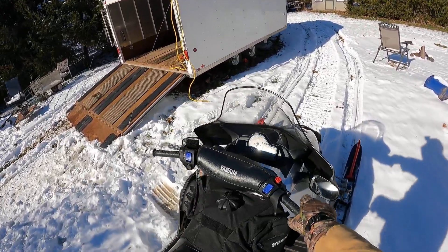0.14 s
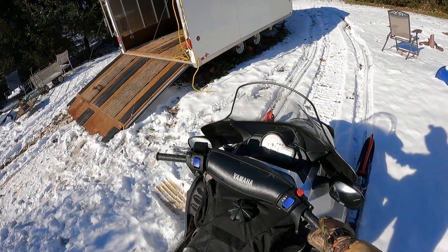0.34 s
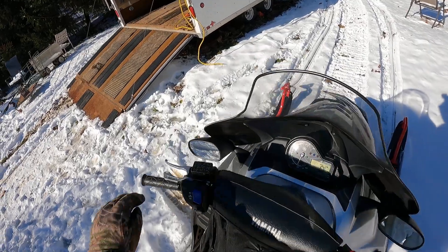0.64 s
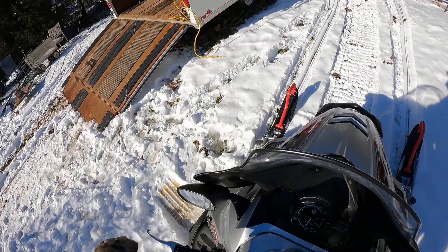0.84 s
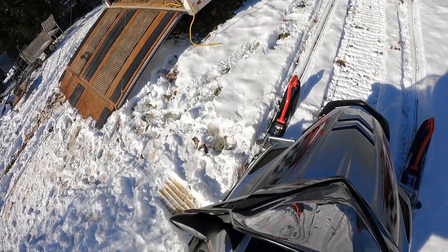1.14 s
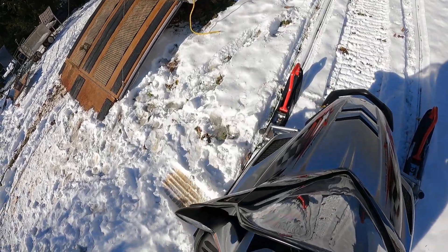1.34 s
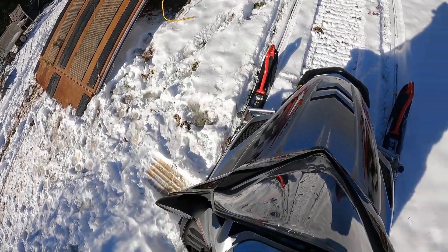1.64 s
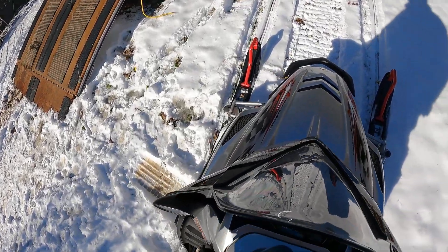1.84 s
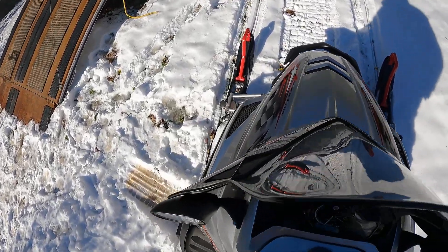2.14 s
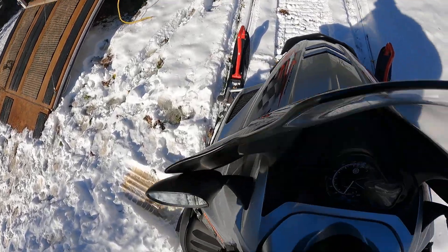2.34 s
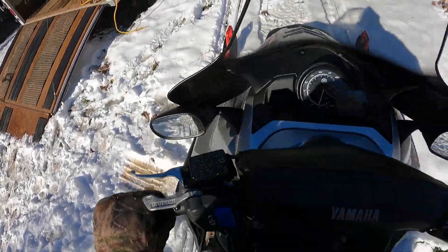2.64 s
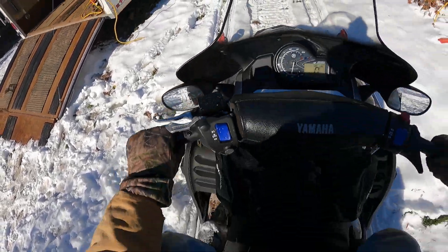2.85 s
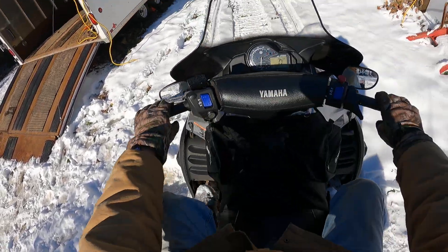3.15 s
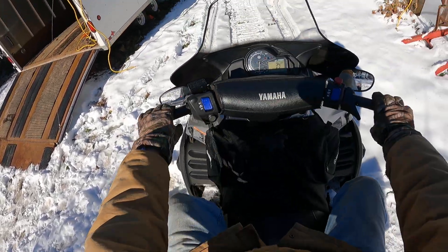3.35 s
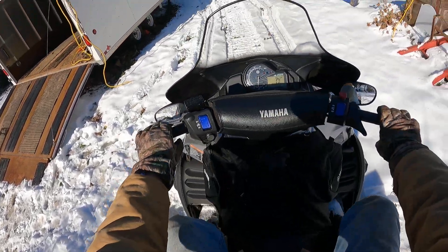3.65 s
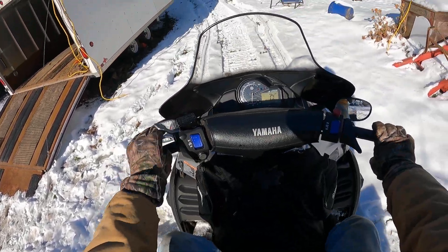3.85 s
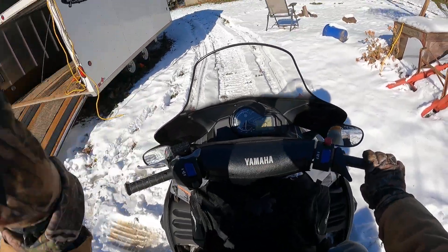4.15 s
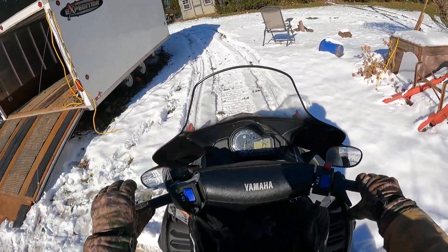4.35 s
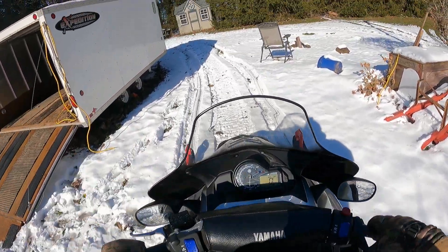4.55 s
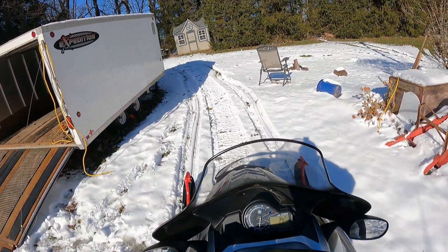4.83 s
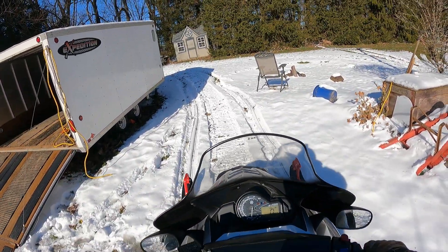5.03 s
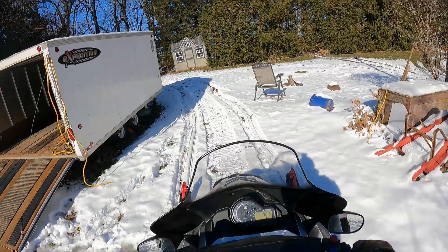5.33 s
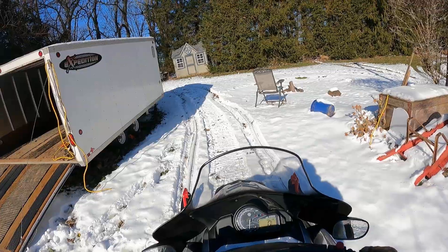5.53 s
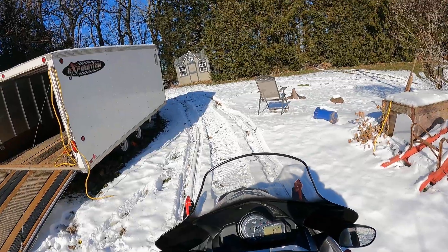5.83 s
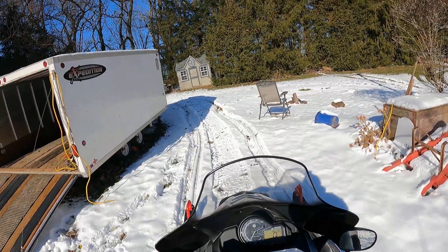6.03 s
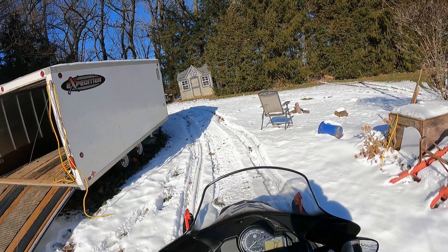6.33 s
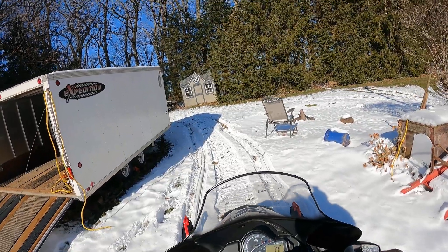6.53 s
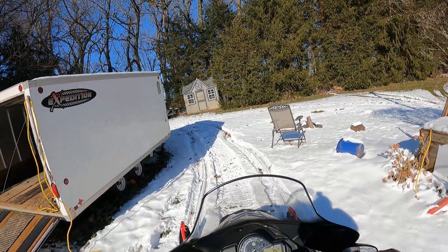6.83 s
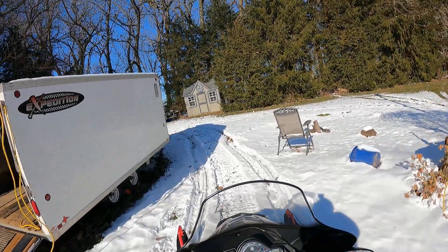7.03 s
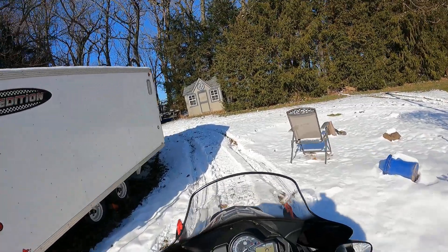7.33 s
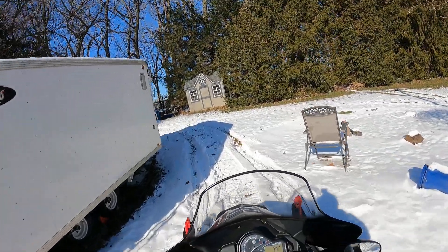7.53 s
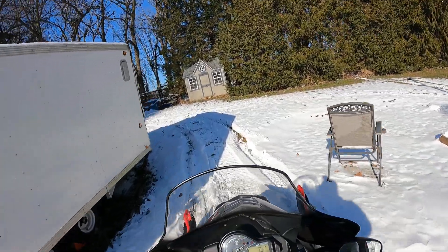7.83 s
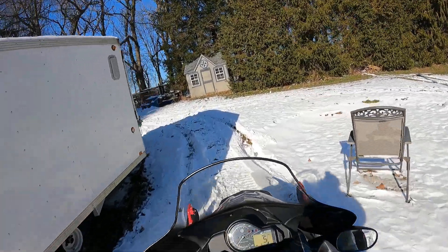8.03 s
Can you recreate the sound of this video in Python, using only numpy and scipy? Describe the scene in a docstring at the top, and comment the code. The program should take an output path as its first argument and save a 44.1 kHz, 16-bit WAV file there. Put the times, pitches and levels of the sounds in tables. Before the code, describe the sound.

A snowmobile idles with a deep, lumpy throb and hood clatter, a glove taps the camera, then it revs with a belt squeal and pulls away.

```python
"""Beside a trailer, a three-cylinder four-stroke snowmobile idles under its rider, then revs and pulls away.
The rider wears the camera. The silencer booms on low multiples of the engine cycle, made from cosines.
Each firing barks as a pulse ringing the pipe; the valve gear clatters under the hood as bursts of noise.
The idle hiccups with low misfire thuds, a glove taps the camera, fabric rustles, the belt squeals as it grips.
Low thuds follow as the sled lurches; the trailer wall on the left returns a little of the bark."""
import sys
import numpy as np
from scipy import signal
from scipy.fft import rfft, irfft, next_fast_len
from scipy.io import wavfile
from scipy.ndimage import uniform_filter1d

SR = 44100
rng = np.random.default_rng(int(sys.argv[2]) if len(sys.argv) > 2 else 0)


def natural_amplitude(level_db):
    """Convert a level in decibels to a linear amplitude factor, elementwise."""
    exponent = np.asarray(level_db, float) / 20
    return 10 ** exponent


def log_audio(samples):
    """Write samples as a 16-bit WAV file to the path given in sys.argv[1]."""
    # one column per channel
    frames = np.atleast_2d(samples).T
    # limit to full scale, then quantise
    limited = np.clip(frames, -1, 1)
    pcm = np.round(limited * 32767).astype(np.int16)
    wavfile.write(sys.argv[1], SR, pcm)


N = 360738
T = np.arange(N) / SR

# Engine speed; one cycle is two crank turns. Each row: time in seconds, cycles per second in Hz.
CYCLE_RATE = [(0, 18.258), (0.45, 18.328), (0.85, 17.997), (1.36, 17.619), (2.03, 18.513), (2.4, 18.217),
              (2.7, 18.406), (3.0, 18.084), (3.6, 17.814), (4.04, 18.252), (4.36, 17.612), (4.65, 18.012),
              (5.05, 18.186), (5.35, 17.755), (5.74, 18.979), (5.85, 22.177), (6.1, 33.632), (6.32, 31.878),
              (6.56, 33.465), (6.68, 33.249), (6.84, 34.67), (7.04, 34.346), (7.13, 32.482), (7.3, 32.716),
              (7.52, 30.362), (7.76, 25.713), (8.0, 30.344), (8.18, 32.234)]
CYCLE_START = .3  # cycles already run at time 0
IDLE_HZ, LOAD_HZ = 19, 27  # cycle rates where load starts to grow and where it is full
# Throttle and roughness. Each row: time in seconds, throttle from 0 to 1, uneven firing from 0 to 1.
THROTTLE = [(5.68, 0, 0.13), (5.96, 0.63, 0.5), (6.08, 0.79, 0), (6.7, 1, 0.4), (6.85, 1, 0.9),
            (7.0, 1, 0.3), (7.3, 0.7, 0.6), (7.55, 0.5, 0.7), (7.76, 0.32, 0.8), (7.87, 0.5, 0.8),
            (7.98, 0.47, 0.7), (8.1, 0.7, 0.2)]
# The rider's head. Each row: time in seconds, lean from -1 (standing back) to 1 (over the hood),
# clatter level in dB and hiss level in dB, both with the throttle closed.
HEAD = [(0, -0.74, -33, -55), (.6, -0.14, -34.5, -54.5), (1.0, 0.46, -36, -53), (1.35, 0.58, -34, -48),
        (1.9, 0.37, -32, -46), (2.45, 0.33, -31.5, -46), (2.72, 0.27, -31.5, -51), (3, -0.024, -34, -49),
        (3.5, 0.055, -35, -51), (4.18, -0.16, -34.5, -48), (4.45, 0.24, -34, -52),
        (4.85, 0.038, -35, -51.5), (5.7, -0.18, -33.5, -49.5), (5.84, 0.12, -29, -44.5),
        (6.05, 0.13, -32, -47.5), (6.5, -0.077, -31.5, -48), (7.0, -0.17, -33, -48),
        (7.35, -0.042, -31.5, -46.5), (7.6, -0.15, -33, -47), (7.85, 0.034, -29.5, -43.5),
        (8.18, 0.069, -28.5, -44)]
# Levels with the throttle closed and no lean: boom and bark in dB.
IDLE_DB = {"boom": -15, "bark": -28}
# Gained leaning fully over the hood: boom and bark in dB.
LEAN_DB = {"boom": -3, "bark": 6}
# Gained at full throttle: boom, bark, clatter and hiss in dB.
OPEN_DB = {"boom": 1.75, "bark": 8, "clatter": 6.5, "hiss": 2}

# Balance of the boom's tones. Each row: multiple of the cycle rate, idle level in dB, level under load in dB,
# gain at idle in dB per unit of lean either way from the seat.
BOOM_ORDERS = [(1, -40, -12.5, -9.5), (2, -6.5, -6.5, 8), (3, 11.5, -13, -3.5), (4, 0, -22.5, 0),
               (5, -12, -19, -9.5), (6, -15, -15, 4), (7, -32, -36, 4)]
# Silencer chambers that delay the boom; hot gas raises the upper one.
# Each row: idle frequency in Hz, frequency under load in Hz, width in Hz.
CHAMBERS = [(45, 45, 12), (81, 112, 4)]
# Delay of the boom: at idle and under load, in cycles of the engine.
BOOM_LAG = (.37, .25)
# Starting point of each boom wave: at idle and under load, in turns of that wave.
BOOM_TURN = (.17, .02)
# The firing tone swells and sinks in the boom. Each row: time in seconds, gain in dB.
FIRING_SWELL = [(5.5, -15), (5.82, -35), (5.94, 0.5), (6.25, -6), (6.68, 7), (6.9, 10), (7.03, 2),
                (7.38, 1.5), (7.74, 14), (7.86, -0.5), (7.98, 10.5), (8.1, 0)]
STUMBLE_DB = -1.5  # boom gain when the firing is most uneven
# Misfires that thud low in the silencer. Each row: rough time in seconds (moved within its cycle), level in dB.
HICCUPS = [(.925, -7.5), (1.375, -12.5), (1.655, -13.5), (2.695, -36), (3.245, -11.5), (3.355, -9),
           (3.685, -11.5), (4.075, -10.5), (4.245, -8.5), (4.635, -9), (4.855, -10)]

# Firing strength. Each row: place in the cycle from 0 to 1, idle level in dB, level under load in dB.
CYLINDERS = [(.97, 0, 0), (.303, -12, -18), (.637, -11, -13)]
# Pipe resonances. Each row: frequency in Hz, width of each of two filters in Hz, then three lean levels in dB
# (standing back, seated, over the hood; counted twice at idle, once under load), dB added under load.
PIPE_MODES = [(148.3, 11.8, 1.5, 4.5, 5, -28), (164.3, 21, -0.5, 0, 7.5, -5), (214, 22, 0, 1, 0.5, -12),
              (258.7, 29.4, 3, 0.5, -1, 4.5), (297.6, 29.3, -11, -4.5, -2, 7),
              (329.3, 21, -7.5, -3, -1.5, -5), (385.4, 58, 0, -5, -5, -9),
              (455.5, 51, -10, -8.5, -10.5, -4), (564, 45, -12, -13.5, -16, -2),
              (592, 66, -21, -20, -21, 10.5)]
# How early each mode speaks; negative is late. Each row: frequency in Hz, lead at idle in ms,
# lead under load in ms, lead at idle leaning over the hood in ms.
MODE_LEAD = [(164, -8.1, 8, -5.6), (214, 2.8, -.5, 4.7), (259, 4.8, 0, 4.9), (298, 5.2, -.5, 5.5),
             (329, 7.3, 1.5, 7.3), (385, 5.7, 1.5, 5.5), (455, 4, 1.5, 4), (564, 5, 5.2, 5)]
DULL_DB = -5.5  # gain under load of the pipe modes above 500 Hz, when out of tune with the firing
TUNED_HZ, DETUNE_HZ = 31, 5.2  # cycle rate where those modes sing, and how far below it they are dull

# Hood panel resonances. Each row: frequency in Hz, width in Hz, level in dB, gain in dB per unit of lean
# (counted 2.5 times at idle, 1.5 times under load), dB gained under load.
HOOD_PANELS = [(970, 70, -8.5, 3, 5), (1188, 19, 4, -1.5, -13), (1496, 235, 3, 3.5, -13),
               (1500, 35, -14, -2.5, 15.5), (1690, 47, -13.5, 14, 16), (1888, 150, -2.5, 11, -3.5),
               (2326, 230, -14.5, 2.5, 13), (2770, 260, -1, 5.5, -1), (3280, 280, -9, 12.5, -18.5),
               (4540, 880, -8, 9, 5.5), (6800, 56, -19, 2, 0.5)]
# Colour of the clatter before its bands are levelled. Each row: frequency in Hz, gain in dB.
CLATTER_COLOUR = [(40, -14), (90, 14), (350, 9), (550, -2.5), (780, -11), (1000, -7), (1500, -12.5),
                  (2000, -14.5), (2400, -19), (3000, -20), (4600, -28.5), (7000, -32), (9500, -43),
                  (12500, -47.5), (15500, -74.5)]
# Colour of the clatter's side signal. Each row: frequency in Hz, gain in dB.
SIDE_COLOUR = [(60, -68.5), (350, -24), (780, -19.5), (1500, -15.5), (2200, -13), (6200, -14.5),
               (10000, -14), (12500, -10)]
# Smoothing of each burst's edge: mids, side and treble, in samples.
BURST_RISE = (170, 300, 380)
# Cycle rates between which the bursts run together: start and end in Hz.
BLUR_HZ = (24, 32)
KNOCK_DB, KNOCK_S = -4, .004  # a usual knock over its burst; its decay in seconds
STROKE_DB, RING_DB = 1.1, 2.5  # random spread per cycle of the burst; of each panel's ring before smoothing
# Valve knocks with a set time and level. Each row: time in seconds, dB relative to a usual knock.
SET_KNOCKS = [(.781, 11), (1.341, 9.5), (1.507, 0.5), (1.619, 13.5), (2.276, 11), (2.497, 8.5), (2.551, 7),
              (2.605, 6.5), (3.212, -0.5), (3.377, -1), (3.714, 9), (4.716, 15), (4.941, 18.5),
              (4.994, 12.5)]
RUMBLE_DB, SHAKE_DB = -42, 13  # chassis rumble with steady firing, throttle closed; gain when most uneven

# Belt squeal. Each row: time in seconds, frequency in Hz, level in dB.
SQUEAL = [(5.77, 6210, -64), (5.83, 6230, -58), (5.86, 6245, -60), (5.875, 6255, -52), (5.91, 6270, -53),
          (5.925, 6280, -58), (5.945, 6295, -54), (6.0, 6310, -56), (6.04, 6320, -61), (6.095, 6330, -56),
          (6.13, 6332, -60), (6.22, 6335, -60), (6.4, 6335, -61), (6.55, 6330, -68)]
# Low thuds as the sled lurches. Each row: time in seconds, level in dB.
LURCHES = [(7.3, -18.5), (7.82, -16.5), (7.86, -17), (7.9, -22), (7.93, -22), (8.04, -17)]
# A glove on the camera housing. Each row: time in seconds, strength of the blow in dB.
TAPS = [(4.0125, -38.5), (4.0166, -19), (4.0178, -5), (4.0192, -17)]
# Ringing of the housing. Each row: frequency in Hz, level in dB, time to fall by 60 dB in seconds.
HOUSING = [(3140, -29, 0.0013), (4800, 3.5, 0.0031), (5750, -11, 0.0056), (6870, -19, 0.015),
           (8400, -22, 0.0096), (12100, -40, 0.002)]
# Fabric rustle. Each row: time in seconds, level in dB.
RUSTLE = [(4.3, -68), (4.4, -56), (4.45, -45), (4.53, -44.5), (4.6, -63)]
# Balance of the two microphone ports. Each row: frequency in Hz, left minus right in dB.
EAR_BALANCE = [(60, .2), (150, .1), (210, -.5), (320, 2), (490, 1), (740, -.6), (1130, -.2), (1710, -1),
               (2600, -.3), (5000, .4), (9000, .2), (12500, -3.5)]


def curves(table):
    """Join the columns of a table by straight lines in time."""
    s, *columns = np.transpose(table)
    return [np.interp(T, s, c) for c in columns]


def unit(x):
    """Scale to an rms (average strength) of 1."""
    return x / np.sqrt(np.mean(x ** 2))


def walk(rate):
    """Wander at random: levels held for 1 / rate seconds, then smoothed twice."""
    k = int(SR / rate)
    steps = np.repeat(rng.standard_normal(N // k + 1), k)
    return unit(uniform_filter1d(uniform_filter1d(steps, k), k)[:N])


def band(x, hz, width):
    """A resonance with gain 1 at its centre."""
    return signal.lfilter(*signal.iirpeak(hz, hz / width, fs=SR), x)


def butter(x, order, hz, kind="low"):
    """A plain filter that runs forward in time."""
    return signal.sosfilt(signal.butter(order, hz, kind, fs=SR, output="sos"), x)


def smooth_low(x, hz):
    """Keep the lows without shifting them in time."""
    return signal.sosfiltfilt(signal.butter(2, hz, fs=SR, output="sos"), x)


def decay(x, seconds):
    """Let each value die away exponentially."""
    return signal.lfilter([1], [1, -np.exp(-1 / (seconds * SR))], x)


def shape(x, points):
    """Colour a sound by points of frequency in Hz and gain in dB."""
    n = next_fast_len(N)
    hz, db = np.transpose(points)
    bins_hz = np.arange(n // 2 + 1) * SR / n
    gain_db = np.interp(np.log(bins_hz + 1), np.log(hz + 1), db)
    return irfft(rfft(x, n) * natural_amplitude(gain_db), n)[..., :N]


def struck(events, modes):
    """Every blow rings the same fading tones."""
    blows = np.zeros(N)
    for s, db in events:
        blows[int(s * SR)] = natural_amplitude(db)
    t = T[:SR // 4]
    ring = sum(natural_amplitude(db) * np.sin(2 * np.pi * hz * t) * 1000. ** (-t / t60) for hz, db, t60 in modes)
    return signal.fftconvolve(blows, ring)[:N]


def boom(cycles, hz, load, firing_db, uneven, lean):
    """The silencer passes clean low multiples of the cycle, each delayed by its chambers."""
    out, power = 0, 0
    delay, turn = (idle + load * (loaded - idle) for idle, loaded in (BOOM_LAG, BOOM_TURN))
    for order, idle_db, load_db, away_db in BOOM_ORDERS:
        level_db = idle_db + load * (load_db - idle_db) + away_db * np.abs(lean) * (1 - load)
        level_db = level_db + (order == 3) * firing_db  # three firings a cycle
        gain = natural_amplitude(level_db + (.7 + 4 * uneven ** 2) * walk(14 + 3 * order))
        tone_hz = order * hz
        lag = sum(np.arctan2(tone_hz * width, (idle + load * (loaded - idle)) ** 2 - tone_hz ** 2)
                  for idle, loaded, width in CHAMBERS)
        drift = 0.017 * walk(1.2) + 0.9 * uneven ** 2 * walk(14)
        phase = 2 * np.pi * (order * (cycles - delay) - turn) - lag + drift
        # the sixth order leaves the silencer upside down
        out = out + (-1) ** (order == 6) * gain * np.cos(phase)
        power = power + uniform_filter1d(gain ** 2, SR // 8) / 2
    return out / np.sqrt(power)


def hiccups(cycles):
    """A misfire thuds in the silencer, always just after the first cylinder's turn."""
    thuds = []
    for s, db in HICCUPS:
        place = np.floor(np.interp(s, T, cycles)) + 0.14
        thuds.append((np.interp(place, cycles, T), db))
    return struck(thuds, [(79.3, 0.042, 0.16)])


def firings(cycles, load, uneven):
    """Three unequal pulses a cycle, each a little early or late."""
    whole = np.arange(int(cycles[-1]))
    pulses = np.zeros(N)
    for place, idle_db, load_db in CYLINDERS:
        shift, size = rng.standard_normal((len(whole), 2)).T
        jitter = .0012 + .014 * np.interp(whole, cycles, uneven) ** 2  # cycles
        at = np.interp(whole + place + jitter * shift, cycles, np.arange(N)).astype(int)
        level_db = idle_db + load[at] * (load_db - idle_db)
        pulses[at] = natural_amplitude(level_db + (1.0 + 0.94 * uneven[at] ** 2) * size)
    return unit(pulses)


def bark(cycles, rate, load, lean, uneven):
    """Firing pulses ring the resonances of the pipe."""
    # turbulent gas roughens the ring between firings
    gas = (.06 - .035 * load + .3 * uneven ** 2) * rng.standard_normal(N)
    drive = firings(cycles, load, uneven) + gas
    lead_hz, *leads = np.transpose(MODE_LEAD)
    near = np.interp(lean, [.08, .25], [0, 1])
    dull_db = DULL_DB * np.clip((TUNED_HZ - rate) / DETUNE_HZ, 0, 1)
    out = 0
    for hz, width, back, seated, over, loaded in PIPE_MODES:
        idle, load_drive, leaning = [np.roll(drive, -int(np.interp(hz, lead_hz, ms) * SR / 1000))
                                     for ms in leads]
        push = (1 - load) * ((1 - near) * idle + near * leaning) + load * load_drive
        lean_db = np.interp(lean, [-.7, 0, .8], [back, seated, over])
        level_db = (2.0 - load) * lean_db + load * (loaded + (hz > 500) * dull_db)
        out = out + natural_amplitude(level_db) * band(band(push, hz, width), hz, width)
    # the silencer swallows the crack of each firing
    out = butter(out, 4, 800)
    return out / np.sqrt(uniform_filter1d(out ** 2, SR // 4))


def valve_knocks(since, strokes, scatter):
    """One quickly fading knock a cycle, some set by hand, from usual to much harder."""
    knock_s, knock_db = np.interp(np.arange(strokes) - 1, since, T), 2 * scatter
    for s, db in SET_KNOCKS:
        k = np.argmin(np.abs(knock_s - s))
        knock_s[k], knock_db[k] = s, db
    knocks = np.zeros(N)
    knocks[(knock_s * SR).astype(int)] = natural_amplitude(KNOCK_DB + knock_db)
    return decay(knocks, KNOCK_S)


def clatter(cycles, rate, load, lean, low_db, high_db, rumble_db):
    """Dense ticks burst as the valves seat, die over the cycle and ring the hood; gives mid and side."""
    since = cycles - .525  # the valves seat at this place in the cycle
    blur = np.interp(rate, BLUR_HZ, [0, 1])
    strokes = int(cycles[-1]) + 2
    stroke = since.astype(int) + (since > 0)
    chance = rng.standard_normal((strokes, 3 + len(HOOD_PANELS))).T
    length = .66 + .05 * chance[1][stroke]  # cycles
    burst = natural_amplitude(STROKE_DB * chance[0])[stroke] * np.exp(-((since % 1) / length) ** 3)
    gate = .68 + 1.8 * blur + burst + (1 - blur) * valve_knocks(since, strokes, chance[2])
    gate = gate / uniform_filter1d(gate, SR // 3)

    gates = np.array([uniform_filter1d(gate, size) for size in BURST_RISE])
    # random loudness makes some samples stand out as ticks
    ticks = gates * natural_amplitude(1.98 * rng.exponential(size=(3, N))) * rng.standard_normal((3, N))
    rung = ticks
    for (hz, width, db, over, loaded), ring in zip(HOOD_PANELS, chance[3:]):
        ring_db = RING_DB * uniform_filter1d(ring[stroke], size=200)
        level_db = db + over * lean * (2.5 - load) + loaded * load + ring_db
        rung = rung + natural_amplitude(level_db) * band(ticks, hz, width)
    mids, other, treble = shape(rung, CLATTER_COLOUR)
    # the treble comes from other parts than the mids
    mid = smooth_low(mids - treble, 2800) + treble
    # much of the side is the same clatter, turned in phase between the ports
    turned = signal.hilbert(mid, next_fast_len(N))[:N].imag
    sound = np.array([mid, shape(turned + other, SIDE_COLOUR)])

    low = smooth_low(sound, 2800)
    high = sound - low
    rumble = smooth_low(low, 480)
    low = low - rumble
    # each band is levelled by its mid, so the side keeps its share
    rumble = rumble / np.std(rumble[0]) * natural_amplitude(rumble_db + 3.8 * walk(12))
    low = low / np.std(low[0]) * natural_amplitude(low_db + 0.75 * walk(4.4))
    high = high / np.std(high[0]) * natural_amplitude(high_db + 0.69 * walk(13))
    return rumble + low + high


def squeal():
    """A thin wavering tone while the belt slips."""
    hz, db = curves(SQUEAL)
    on = (T > SQUEAL[0][0]) & (T < SQUEAL[-1][0])
    wavering_hz = hz + 22 * walk(150)
    return on * natural_amplitude(db + 4 * walk(70)) * np.sin(2 * np.pi * np.cumsum(wavering_hz) / SR)


def lurches():
    """The sled lurches and rings two low tones."""
    return struck(LURCHES, [(145.5, 1, 0.12), (193, -1.5, 0.064)])


def glove_taps():
    """The glove rings the camera housing, and fabric scrapes for a moment after each touch."""
    taps = butter(struck(TAPS, HOUSING), 2, [2400, 9000], "band")
    scrape = decay(np.abs(taps), 0.0078) / SR
    bright = band(band(rng.standard_normal(N), 4800, 5900), 4600, 5900)
    dull = band(band(rng.standard_normal(N), 1800, 1800), 1800, 1800)
    return taps + natural_amplitude(54.0) * scrape * bright + natural_amplitude(50) * scrape * dull


def rustle():
    """Fabric makes brief, soft grains of noise."""
    (db,) = curves(RUSTLE)
    on = (T > RUSTLE[0][0]) & (T < RUSTLE[-1][0])
    grains = natural_amplitude(1.7 * rng.exponential(size=N)) * rng.standard_normal(N)
    hiss = butter(grains, 4, [1500, 4000], "band")
    body = natural_amplitude(-6) * band(band(grains, 1720, 260), 1720, 260)
    return on * natural_amplitude(db) * unit(hiss + body)


def wall_echo(pipe):
    """The trailer wall on the left returns a little of the bark 15 ms later."""
    return natural_amplitude(-16.0) * np.roll(band(pipe, 780, 300), int(0.015 * SR))


def scene():
    """Mix the engine, ahead and below, nearly the same at both microphone ports."""
    (hz,), (throttle, uneven), (firing_db,) = curves(CYCLE_RATE), curves(THROTTLE), curves(FIRING_SWELL)
    lean, low_db, high_db = curves(HEAD)
    boom_db, bark_db = (IDLE_DB[k] + LEAN_DB[k] * np.maximum(lean, 0) + OPEN_DB[k] * throttle
                        for k in ("boom", "bark"))
    cycles = CYCLE_START + np.cumsum(hz) / SR
    load = np.clip((hz - IDLE_HZ) / (LOAD_HZ - IDLE_HZ), 0, 1)

    lows = natural_amplitude(boom_db + STUMBLE_DB * uneven) * boom(cycles, hz, load, firing_db, uneven, lean)
    lows = lows + hiccups(cycles) + lurches()
    pipe = natural_amplitude(bark_db) * bark(cycles, hz, load, lean, uneven)
    low_db = low_db + OPEN_DB["clatter"] * throttle
    high_db = high_db + OPEN_DB["hiss"] * throttle
    rumble_db = RUMBLE_DB + SHAKE_DB * uneven + 3 * throttle
    mid, side = clatter(cycles, hz, load, lean, low_db, high_db, rumble_db)
    taps = glove_taps()
    mid = mid + lows + pipe + taps + squeal() + rustle()
    # the left port is a fraction of a sample further away
    lag = 0.077 * (np.roll(mid, 1) - mid)
    side = side + lag + wall_echo(pipe) + natural_amplitude(-39.5) * lows + natural_amplitude(-25.5) * taps
    # ear is 1 for left and -1 for right; each takes half the balance
    return np.array([shape(mid + ear * side, np.array(EAR_BALANCE) * [1, ear / 2]) for ear in (1, -1)])


def band_limit(x):
    """A steep low-pass at the top of the band."""
    return signal.sosfilt(signal.butter(12, 15700, fs=SR, output="sos"), x)


def record(dry):
    """Gain control pulls down all but the lows for a moment after a sharp tap in the treble."""
    lows = smooth_low(dry, 450)
    treble = np.abs(butter(dry[0], 2, 3000, "high"))
    over = decay(np.maximum(treble - .12, 0), 0.06)
    gain = 1 / (1 + 0.35 * np.roll(over, int(0.0032 * SR)))  # reacts 3.2 ms late
    mix = lows + gain * (dry - lows)
    return band_limit(mix)


dry = scene()
out = record(dry)
log_audio(out)
```